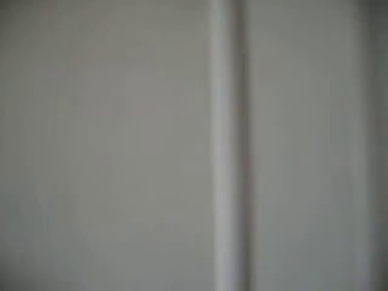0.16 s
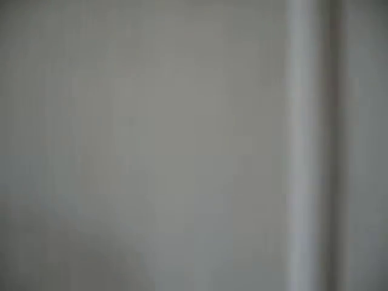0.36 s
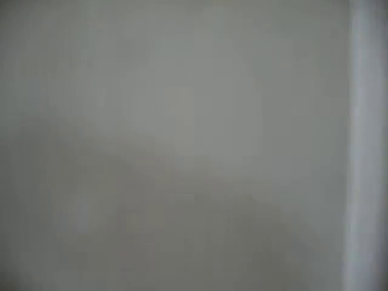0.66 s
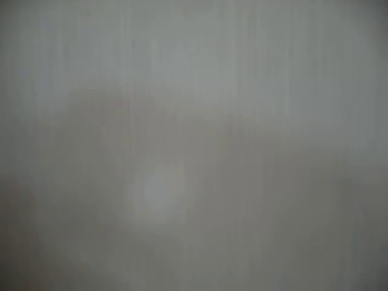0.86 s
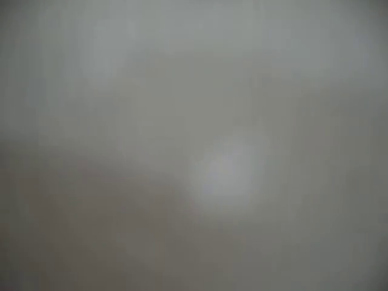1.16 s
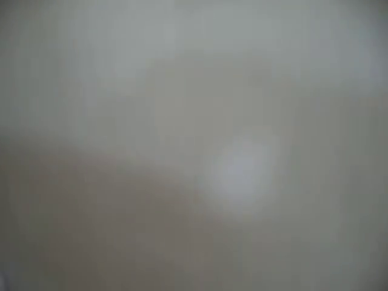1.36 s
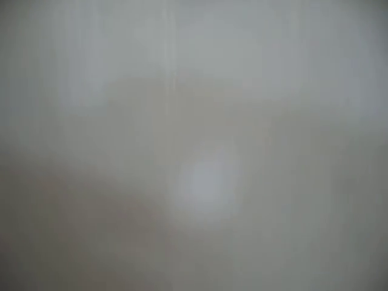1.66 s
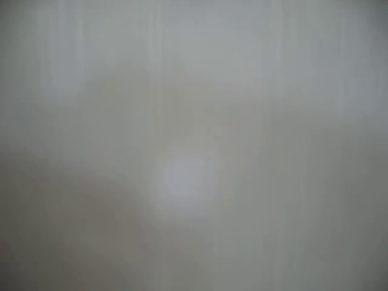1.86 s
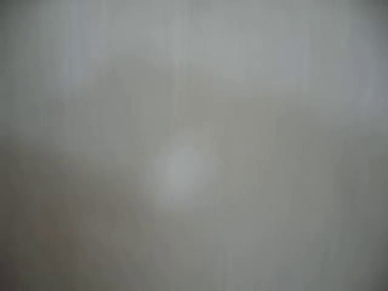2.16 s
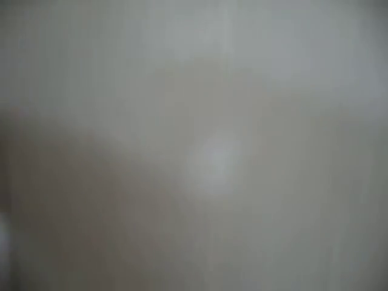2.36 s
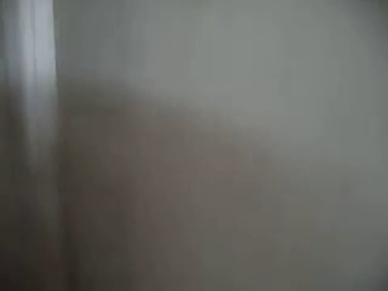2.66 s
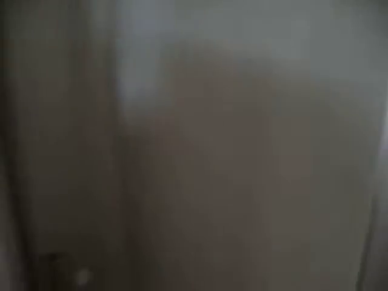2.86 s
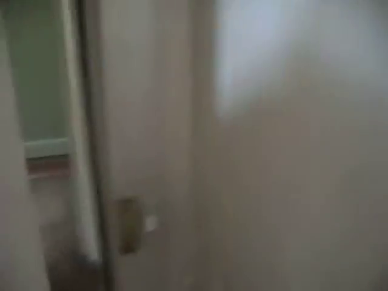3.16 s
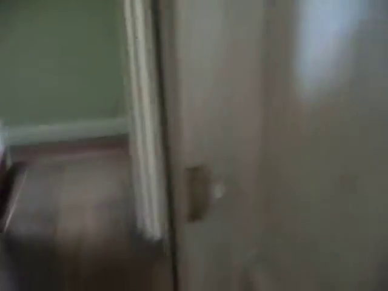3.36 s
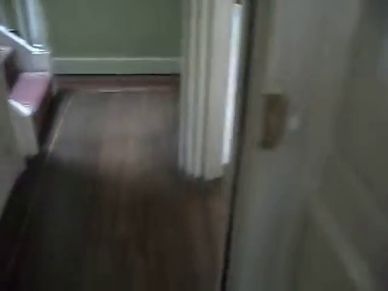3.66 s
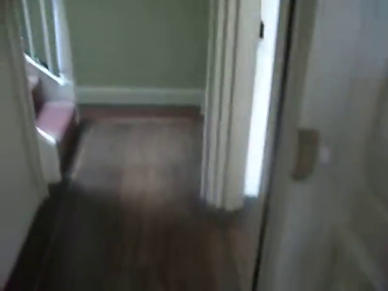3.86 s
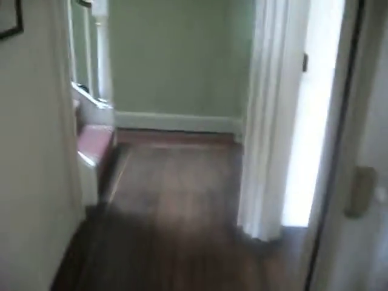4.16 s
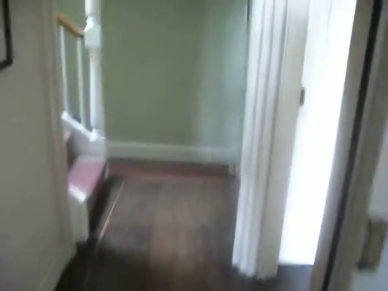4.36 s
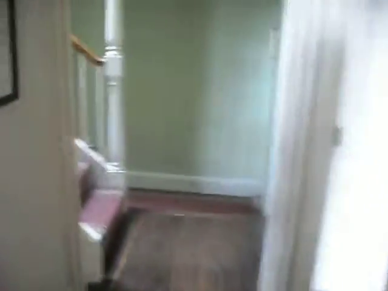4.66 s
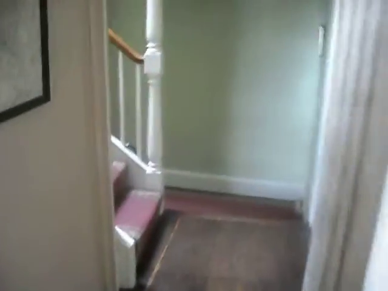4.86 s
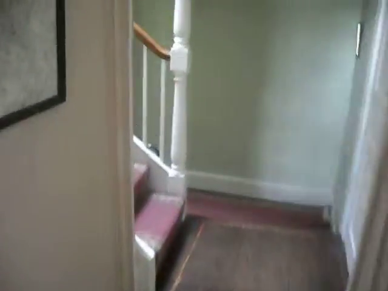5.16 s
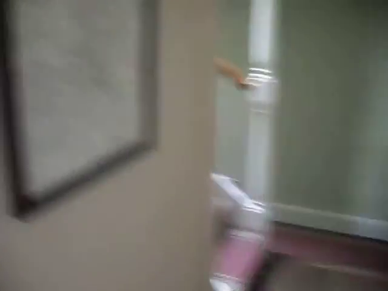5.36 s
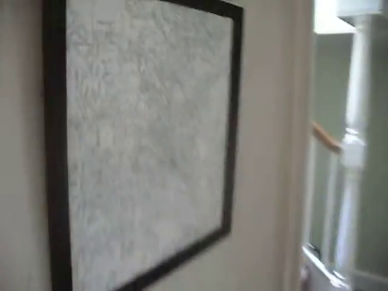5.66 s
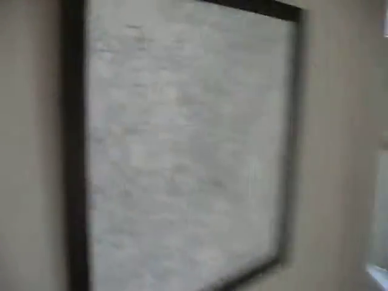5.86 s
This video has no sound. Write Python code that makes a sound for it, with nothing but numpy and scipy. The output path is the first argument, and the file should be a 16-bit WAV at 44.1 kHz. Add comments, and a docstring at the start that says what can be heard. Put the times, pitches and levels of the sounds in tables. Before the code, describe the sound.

A slow walk over old wooden floorboards, heard through a small handheld camera with dull upper treble. A deep motor hum with brief dips, low rumble, smooth hiss and a faint high whine continue throughout. A small cluster of knocks comes at 0.25 s, then light ticks and a short scuff at 0.6-0.9 s. Duller thuds and knocks follow at 1.4-1.7 s, leading to the loudest, sharp cracks around 1.9-2.0 s, with low handling bumps. After faint ticks to 2.25 s, the hum thins and the steps pause. Soft scuffing and clicks return at 3.1 s; a tiny, thin, high squeak sounds at 3.4 s with light knocks. The room becomes more reverberant. A strong thudding knock lands at 4.35 s, then firm knocks at 4.5 s. Cloth brushes softly around 5.2 s, with final knocks and dragging soles from 5.3 to 5.8 s.

```python
"""A slow walk over old floorboards, from a small room into a bare hall, with a small camera in hand.
A deep motor hum that dips now and then, hiss and a faint electronic whine lie under the whole scene.
From 0.25 s boards crack, knock and tick as bursts of noise rung through resonances; dragged soles add catches.
The loudest cracks come at 1.9 s with low bumps of the hand; at 2.3 s the hum's overtones sink.
A thin squeak, a sliding sine, follows at 3.4 s; then reverberation grows and soft cloth noise brushes at 5.2 s."""
import sys
import numpy as np
from scipy import signal
from scipy.fft import rfft, irfft
from scipy.io import wavfile
from scipy.ndimage import uniform_filter1d

SR = 44100
rng = np.random.default_rng(int(sys.argv[2]) if len(sys.argv) > 2 else 0)


def dump(signal):
    """Clip the signal to [-1, 1] and save it as 16-bit WAV at the path in sys.argv[1]."""
    limited = np.clip(np.atleast_2d(signal).T, -1, 1)
    pcm = np.round(limited * 32767).astype(np.int16)
    wavfile.write(sys.argv[1], SR, pcm)


N = 265741  # samples
TIME = np.arange(N) / SR


def undb(db):
    """Decibels to gain."""
    return 10 ** (np.asarray(db) / 20)


def along(hz, points):
    """Read (Hz, value) points on a log-frequency axis."""
    point_hz, value = np.transpose(points)
    return np.interp(np.log(hz + 1e-3), np.log(point_hz), value)


def add(out, start_s, sound):
    """Mix a sound into out from start_s on."""
    i = int(start_s * SR)
    out[i:i + len(sound)] += sound[:len(out) - i]


def unit(x):
    """Scale each row to energy 1."""
    return x / np.sqrt(np.sum(x ** 2, axis=-1, keepdims=True) + 1e-18)


def walk(rate_hz):
    """Slow random drift of RMS 1: levels drawn rate_hz times a second and smoothed twice."""
    hold = int(SR / rate_hz)
    steps = np.repeat(rng.standard_normal(N // hold + 1), hold)
    smooth = uniform_filter1d(uniform_filter1d(steps, hold), hold)
    return unit(smooth[:N]) * np.sqrt(N)


def swell(t, time_s, shape):
    """An envelope that rises as t ** shape and dies away exponentially."""
    return (t / time_s) ** shape * np.exp(-t / time_s)


def decay_60db(t, t60_s):
    """An exponential fade that falls 60 dB in t60_s."""
    return np.exp(-np.log(1000) * t / t60_s)


# Floorboard knocks. Each row: start in seconds, level in dB before the board colours it, thud in dB and
# crack in dB (both relative to that level), base swell and fade time in seconds.
KNOCKS = [(0.249, -37.5, -5, -13.5, 0.0068), (0.265, -42.5, 10, -23, 0.0092),
          (0.289, -49, 21.5, -34, 0.0078), (0.693, -46.5, -20, -16, .0035), (0.726, -49.5, 5, -13, 0.0059),
          (0.838, -43.5, 11, -3.5, 0.0042), (0.861, -49, 5, -2.5, 0.013), (1.365, -49, 21, -47, .006),
          (1.423, -40, 2, -7, 0.0045), (1.479, -48, 13.5, -6.5, 0.005), (1.53, -41.5, 9, -10.5, .0075),
          (1.575, -44.5, -6, -32, 0.0061), (1.694, -47, 11, -9.5, 0.0065),
          (1.9122, -33.5, -8.5, -1, 0.0071), (1.9192, -32, -10, -16, 0.0033), (1.95, -23, -6.5, -5, 0.0054),
          (1.998, -36.5, -8, -24, 0.0066), (2.119, -47, -13, -5.5, 0.0082), (2.251, -52, -22, -1, 0.0031),
          (3.107, -46.5, -16, -1.5, 0.0066), (3.122, -39.5, -9, -2.5, 0.0097), (3.444, -46, 5, -19, .01),
          (3.464, -45.5, -8, -10, .009), (3.654, -64.5, 30, -19, 0.0061), (4.354, -29, 3, -16.5, 0.0088),
          (4.509, -34.5, -12, -4.5, 0.0091), (4.556, -36, 1.5, -7.5, 0.0054), (5.297, -51.5, 9, -4, .009),
          (5.365, -47.5, 9, -19, 0.0063), (5.598, -35.5, -2.5, -2.5, 0.0084),
          (5.817, -42.5, -8, -15, 0.0086)]
# Tone control of a knock, in Hz: where the thud, the level (twice), the crack and the tick apply.
KNOCK_HZ = [260, 800, 1800, 3700, 8000]
# Reverberation of the rooms. Each row: frequency in Hz, time to fade by 60 dB in seconds.
REVERB_TIMES = [(120, 1), (400, 0.45), (1200, 0.41), (3500, 0.38), (9000, 0.24)]
# Reverberation growing from small room to bare hall. Each row: time in seconds, share in dB.
REVERB_SHARE = [(0, -8.5), (2.3, -8), (3.2, -6), (4.5, -4), (5.6, -2)]
TICK_DB, TICK_PER_CRACK = -8.5, 0.8  # a harder crack also ticks more at the very top (dB, dB per dB)


def floorboards(size=24576, count=14, dispersion=0.23, attack=0.57, quick=0.93, build_s=0.022,
                bass_db=-5, snap_db=-5, snap_s=0.000083):
    """A knock is a snap plus bending waves, treble quickest; reverberation rings on, the board colours all."""
    t, f = np.arange(size) / SR, np.fft.rfftfreq(size, 1 / SR)
    # half-octave bands that overlap
    centres = 125 * 2 ** (np.arange(count) / 2)
    distance = np.clip(2 * np.log2((f + 1) / centres[:, None]), -1, 1)
    bands = np.cos(np.pi / 2 * distance)
    # reflections take a moment to build up, then fade at the rate of their band
    build = 1 - np.exp(-(t / build_s) ** 2)
    tail = build * decay_60db(t, along(centres, REVERB_TIMES)[:, None])
    # low bands swell and fade more slowly than 1.2 kHz, high bands faster
    slowness = (1200 / centres[:, None]) ** dispersion
    # the first slip of wood on wood is mostly treble
    snap = undb(snap_db) * np.minimum(centres[:, None] / 5000, 1)
    # the knocks are thinner in the bass, most of all near 180 Hz
    bass_tone_db = along(centres, [(125, bass_db), (180, -7.5), (250, -4.0), (400, -4)])
    weight = np.sqrt(centres) * undb(bass_tone_db)
    out = np.zeros(N)
    for s, db, thud_db, crack_db, fade_s in list(KNOCKS) + scuffs():
        tick_db = TICK_DB + TICK_PER_CRACK * crack_db
        share_db = np.interp(s, *np.transpose(REVERB_SHARE))
        waves = irfft(bands * rfft(rng.standard_normal(size)), size)
        envelope = swell(t, quick * max(fade_s, 1e-3) * slowness, attack)
        burst = unit(waves * slips(size) * envelope)
        # the slower the knock, the weaker its snap
        snap_gain = snap * np.exp(-(fade_s / 0.014) ** 2)
        burst = unit(burst + snap_gain * unit(waves * np.exp(-t / snap_s)))
        reverb = undb(share_db) * unit(waves * tail)
        colour_db = along(centres, list(zip(KNOCK_HZ, [thud_db, 0, 0, crack_db, tick_db])))
        knock = (weight * undb(db + colour_db)) @ (burst + reverb)
        add(out, s, board(knock, s))
    return out


# Soles dragging or rolling over the wood. Each row: start in seconds, length in seconds, starting level in dB,
# thud in dB and starting crack in dB (both relative to the level).
SCUFFS = [(0.605, .12, -58.5, 18.5, 0.5), (1.638, 0.19, -52, 7.5, -43), (3.083, 0.088, -49, -7, -10),
          (5.512, .07, -48, -1.5, -13), (5.648, .155, -41.5, 2, -8)]
SCUFF_FADE_S = 0.008  # base swell and fade time of each catch
SCUFF_EASE_DB_PER_S, SCUFF_DULL_DB_PER_S = 29, 65  # it weakens and dulls as the sole comes to rest


def scuffs(count=4, jitter=.1, scatter_db=1):
    """A dragged sole catches at uneven moments; the catches are small knocks that tend to soften and dull."""
    chance, rows = rng.standard_normal((len(SCUFFS), count, 2)), []
    for (s, length_s, db, thud_db, crack_db), catches in zip(SCUFFS, chance):
        for k, (late, strong) in enumerate(catches):
            t = length_s * (k + jitter * late) / count
            catch_db = db + scatter_db * strong - SCUFF_EASE_DB_PER_S * t
            catch_crack_db = crack_db - SCUFF_DULL_DB_PER_S * t
            rows.append((s + t, catch_db, thud_db, catch_crack_db, SCUFF_FADE_S))
    return rows


def slips(size, grit_db=2.5, slip_s=.0009):
    """Wood sticks and slips: a force that jumps to a new strength about every millisecond."""
    held = (np.arange(size) / (slip_s * SR)).astype(int)
    strength = rng.standard_normal(size)[held]
    return undb(grit_db * np.clip(strength, -2, 2))


# Boards loaded in turn along the walk. Each row: start in seconds, then the board's resonances as pairs of
# frequency in Hz and level in dB.
BOARDS = [ (0.0, [(290, -1), (540, 3.5), (700, 4.5), (980, 2.5), (3000, -4), (3900, -0.5), (8900, 8.5)]),
          (0.5, [(340, -14), (500, -4), (830, -4), (1270, -4.5), (2400, -23), (3750, -3.5)]),
          (1.3, [(270, -5), (400, -1), (560, 3), (905, 2), (1400, -25), (2080, -9), (3850, 2.5),
          (9400, -6)]), (1.8, [(415, 1.5), (550, -7.5), (915, -2.5), (1420, -5), (1680, -4.5), (2120, -4),
          (3600, -6.5), (4950, -23)]), (3.0, [(640, -11), (1090, 0), (1750, -11), (2100, -6), (3400, -4.5),
          (5900, -8.5)]), (3.6, [(285, -3), (355, 9)]), (4.2, [(470, -4), (820, -13), (1050, -0.5),
          (1300, -13), (1640, -6.5), (2080, -23), (3600, -5), (9100, -11)]), (4.48, [(490, 4.5), (760, -2),
          (970, -2), (1300, -11), (1900, -3.5), (2500, -4.5), (3300, -15)]), (5.1, [(400, -8), (840, 1),
          (1020, -2), (1320, -9), (1600, -23), (2550, -16), (3600, -12)])]


def board(x, s, sharpness=14, plain=0.46):
    """Ring x through the resonances of the board underfoot at time s, beside some of the plain sound."""
    modes = [resonances for start_s, resonances in BOARDS if start_s <= s][-1]
    ringing = sum(undb(db) * signal.lfilter(*signal.iirpeak(hz, sharpness, fs=SR), x) for hz, db in modes)
    return plain * x + ringing


# Heavier footfalls. Each row: start in seconds, level of the boom in dB.
FOOTFALLS = [(.289, -40), (1.364, -40.5), (1.531, -47), (1.694, -36.5), (1.915, -42), (4.355, -35)]


def joists(hz=140, decay_s=0.021):
    """Heavier footfalls set the beams under the floor booming: short, low, decaying sines."""
    t, out = np.arange(SR // 3) / SR, np.zeros(N)
    boom = np.exp(-t / decay_s) * np.sin(2 * np.pi * hz * t)
    for s, db in FOOTFALLS:
        add(out, s, undb(db) * boom)
    return out


def squeak(s=3.391, start_hz=7250, end_hz=6850, tremble_hz=350, db=-36, length_s=0.029,
           echo_db=-10, echo_t60_s=0.22):
    """A short, thin rubbing note slides down a little and lingers in a decaying noise echo."""
    t = np.arange(SR // 3) / SR
    progress = np.minimum(t / length_s, 1)
    # the rubbing makes the pitch tremble
    hz = start_hz + (end_hz - start_hz) * progress + tremble_hz * rng.standard_normal(len(t))
    note = np.sin(2 * np.pi * np.cumsum(hz) / SR) * np.sin(np.pi * progress ** 2)
    reflections = rng.standard_normal(len(t)) * decay_60db(t, echo_t60_s)
    echo = unit(signal.fftconvolve(note, reflections)[:len(t)]) * np.linalg.norm(note)
    out = np.zeros(N)
    add(out, s, undb(db) * (note + undb(echo_db) * echo))
    return out


# Low bumps of the hand on the camera. Each row: start in seconds, pitch in Hz, peak of the envelope in dB
# (nearly), decay in seconds.
BUMPS = [(1.886, 32.5, -34, 0.04), (1.936, 44, -32, 0.021), (2.074, 71, -37, 0.022),
         (4.357, 92, -35, 0.016)]


def handling():
    """Jolts through the hand swing the camera body: low sines that swell and die away quickly."""
    t, out = np.arange(SR // 3) / SR, np.zeros(N)
    for s, hz, db, decay_s in BUMPS:
        envelope = np.e * swell(t, decay_s, shape=0.85)
        add(out, s, undb(db) * envelope * np.sin(2 * np.pi * hz * t))
    return out


def sleeve(s=5.2, half_width_s=0.31, db=-54, low_hz=600, flutter_db=0.5):
    """Cloth brushes softly as the walker turns: noise thinned in the bass, swelling once and fluttering."""
    brush = signal.lfilter(*signal.butter(1, low_hz, "high", fs=SR), rng.standard_normal(N))
    level = undb(db + flutter_db * walk(19.9))
    return brush * level * np.exp(-((TIME - s) / half_width_s) ** 2)


# Brief dips of the hum. Each row: centre in seconds, half width in seconds, depth in dB.
HUM_DIPS = [(.19, 0.13, 5), (2.0, 0.033, 14), (3.21, .04, 4), (3.74, 0.069, 18), (5.5, 0.057, 17)]
HUM_HZ, HUM_DB = 29.63, -40.5  # mean pitch and level of the fundamental
# the overtones sink as the walker leaves the first room
OVERTONES_ROOM_DB, OVERTONES_HALL_DB, LEAVES_S, LEAVING_S = -45.5, -52.5, 2.3, .15


def hum(sixth_db=-13, ninth_db=-15, waver=0.004, waver_db=1, overtone_waver_db=3.5):
    """A motor somewhere in the house: a deep note with wavering third, sixth and ninth harmonics."""
    dips_db = sum(depth_db * np.exp(-((TIME - s) / width_s) ** 2) for s, width_s, depth_db in HUM_DIPS)
    in_hall = .5 + .5 * np.tanh((TIME - LEAVES_S) / LEAVING_S)
    overtones_db = OVERTONES_ROOM_DB + (OVERTONES_HALL_DB - OVERTONES_ROOM_DB) * in_hall
    overtones_db = overtones_db + overtone_waver_db * walk(9)
    turn = 2 * np.pi * np.cumsum(HUM_HZ * (1 + waver * walk(2.8))) / SR
    third = np.sin(3 * turn)
    sixth = undb(sixth_db + 2 * walk(2)) * np.sin(6 * turn)
    ninth = undb(ninth_db) * (1 - in_hall) * np.sin(9 * turn)  # gone in the hall
    fundamental = undb(HUM_DB + waver_db * walk(8)) * np.sin(turn)
    return undb(-dips_db) * (fundamental + undb(overtones_db) * (third + sixth + ninth))


# Spectrum of still air and microphone hiss. Each row: frequency in Hz, relative density in dB per Hz.
AIR = [(12, -30), (20, 4), (42, -5), (54, -9.5), (91, -9), (142, -19.5), (171, -21), (296, -24.5),
       (541, -28), (702, -29), (780, -30.5), (7020, -41.5), (10400, -43), (13500, -56), (22000, -120)]
AIR_DB = -51.5  # RMS between 300 Hz and 10 kHz, before rumble_tone and the sway
WHINE_HZ, WHINE_DB = 7140, -70  # the whine's pitch and central RMS level


def air(rumble_db=-5, sway_db=0.5, split_hz=500):
    """Shaped noise: a low rumble that sways at random and a smooth hiss, with a faint electronic whine."""
    f = np.fft.rfftfreq(N, 1 / SR)
    spectrum = rfft(rng.standard_normal(N)) * undb(along(f, AIR))
    middle = irfft(spectrum * ((f > 300) & (f < 10000)), N)
    spectrum = spectrum * undb(AIR_DB) / np.std(middle)
    # the rumble is weaker near 30 and 88 Hz
    rumble_tone = [(30, 2 * rumble_db), (55, -1.3), (88, rumble_db), (125, -0.07)]
    spectrum = spectrum * undb(along(f, rumble_tone))
    low = 1 / (1 + (f / split_hz) ** 2)
    rumble = irfft(spectrum * low, N) * undb(sway_db * walk(12))
    hiss = irfft(spectrum * (1 - low), N)
    whine = np.sqrt(2) * undb(WHINE_DB + 2.1 * walk(8.5)) * np.sin(2 * np.pi * WHINE_HZ * TIME)
    return rumble + hiss + whine


def scene():
    """All sources at the one microphone."""
    return (floorboards() + joists() + squeak() + handling() + hum() + air() + sleeve())[None]


def record(dry, top_hz=12100):
    """The small camera's treble falls away above 10.3 kHz and ends steeply at top_hz."""
    f = np.fft.rfftfreq(N, 1 / SR)
    treble_db = along(f, [(10300, 0), (11000, -14), (11700, -13), (12300, -23)])
    dull = irfft(rfft(dry) * undb(treble_db), N)
    return signal.sosfilt(signal.ellip(8, .2, 70, top_hz, fs=SR, output="sos"), dull)


dry = scene()
out = record(dry)
dump(out)
```